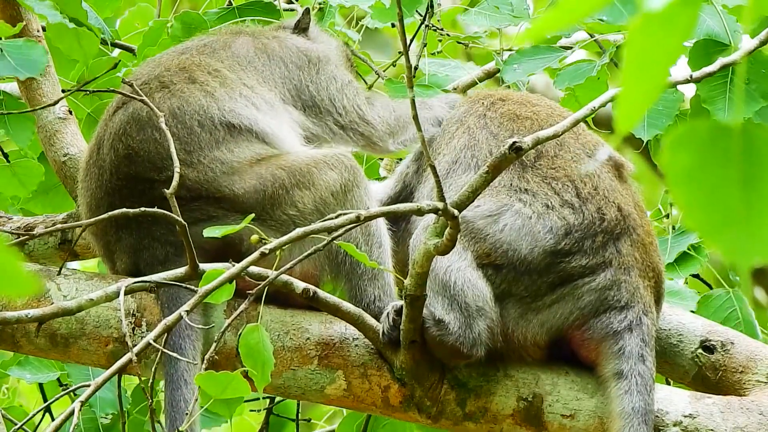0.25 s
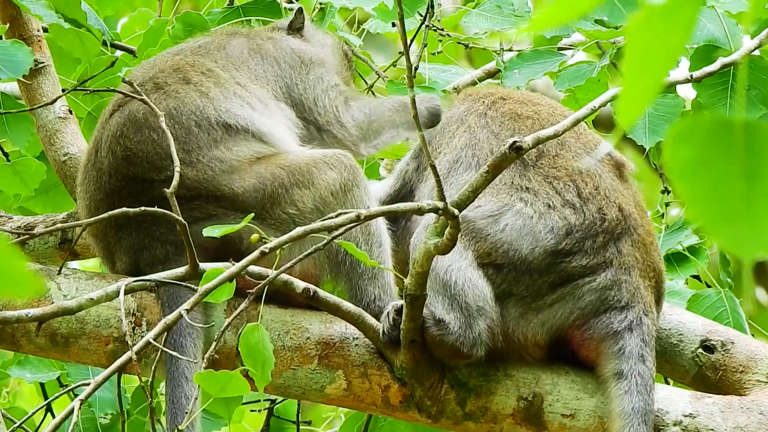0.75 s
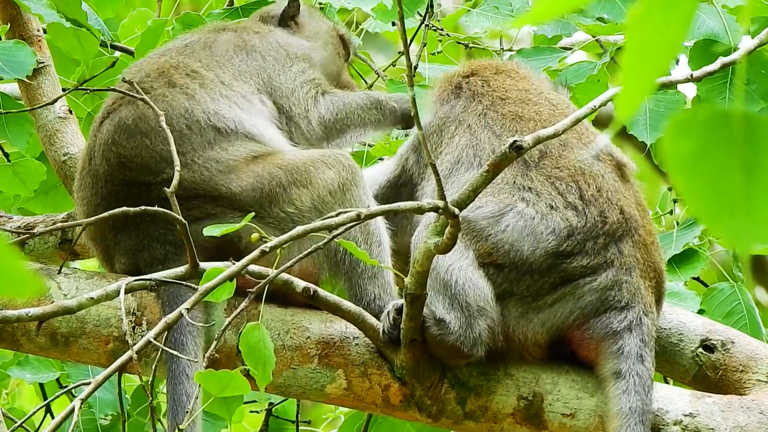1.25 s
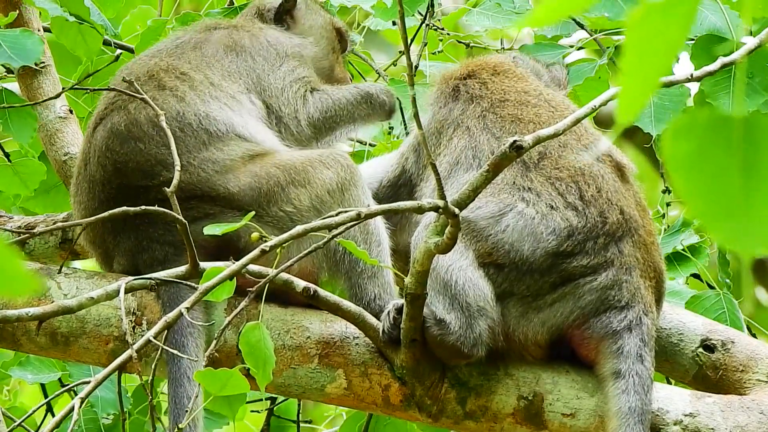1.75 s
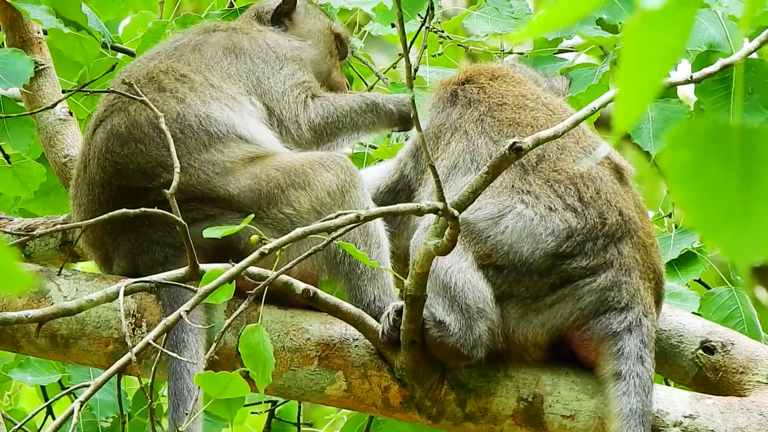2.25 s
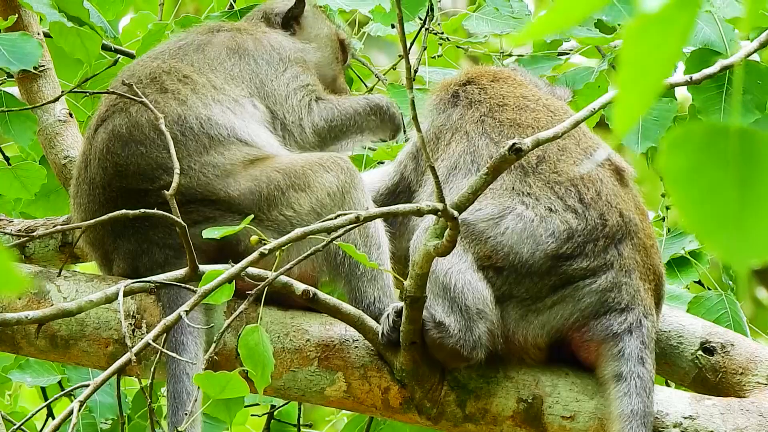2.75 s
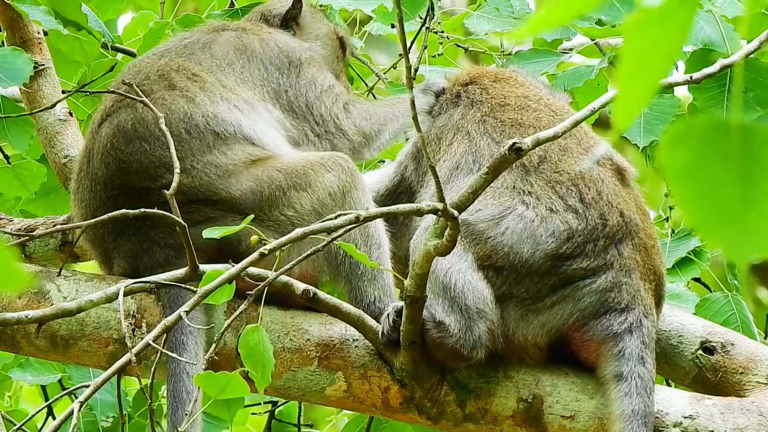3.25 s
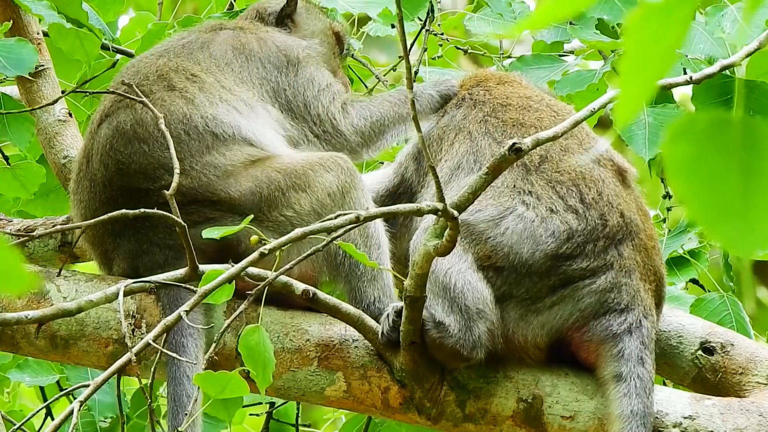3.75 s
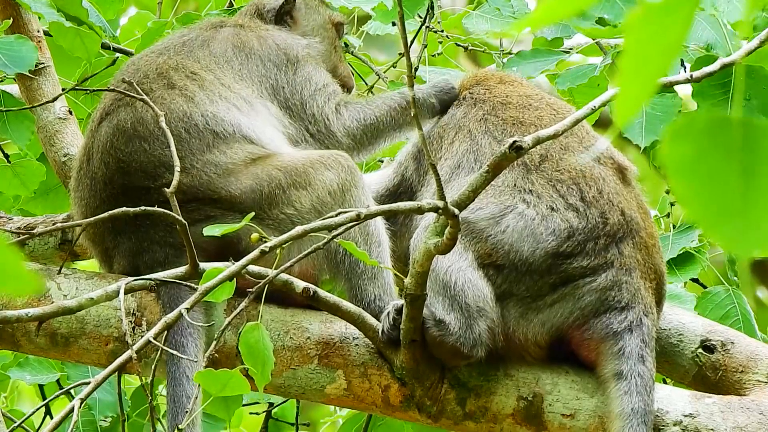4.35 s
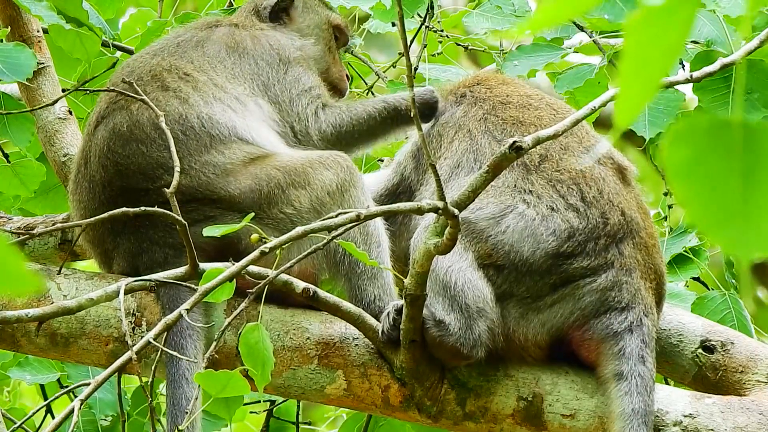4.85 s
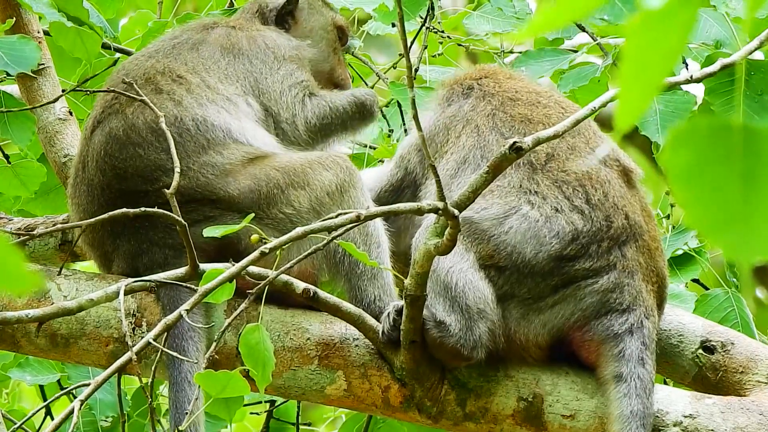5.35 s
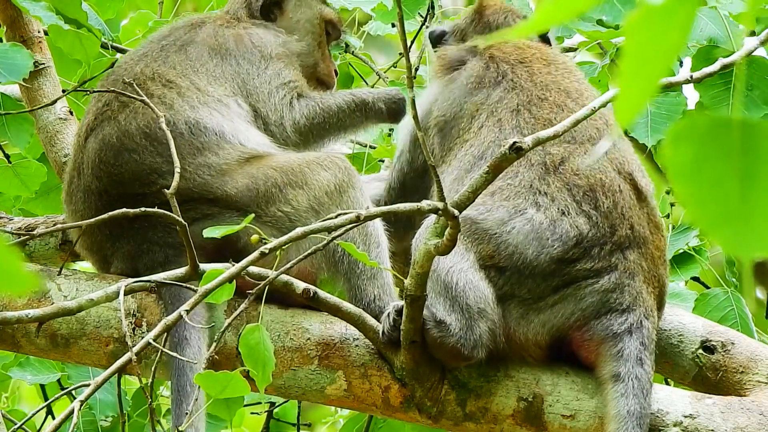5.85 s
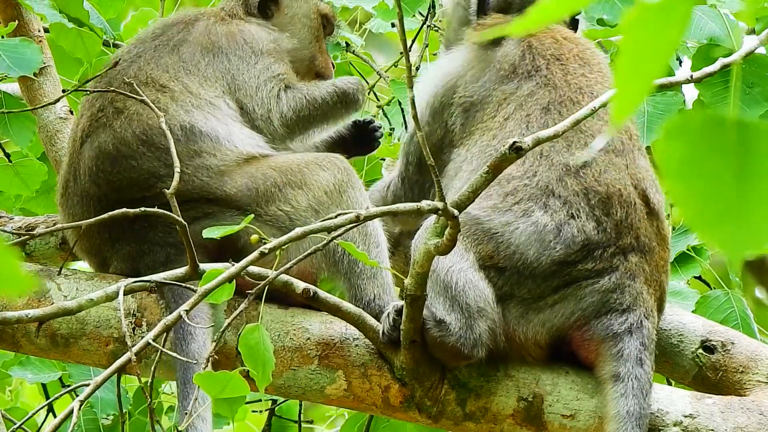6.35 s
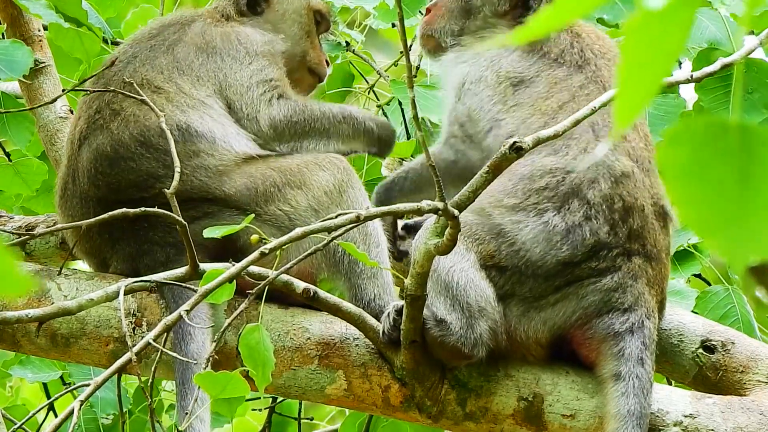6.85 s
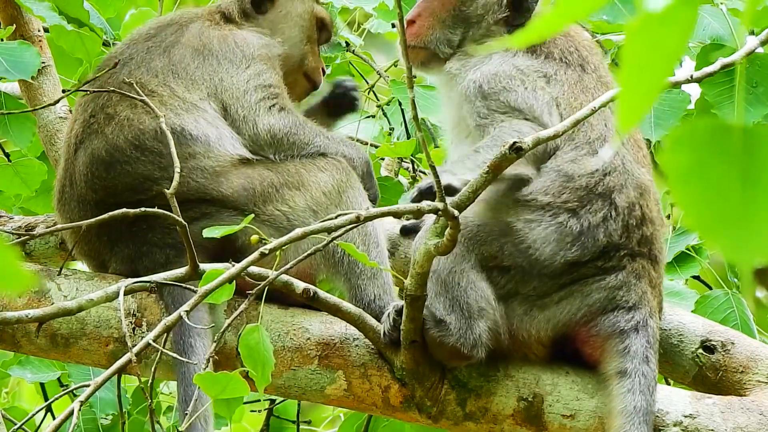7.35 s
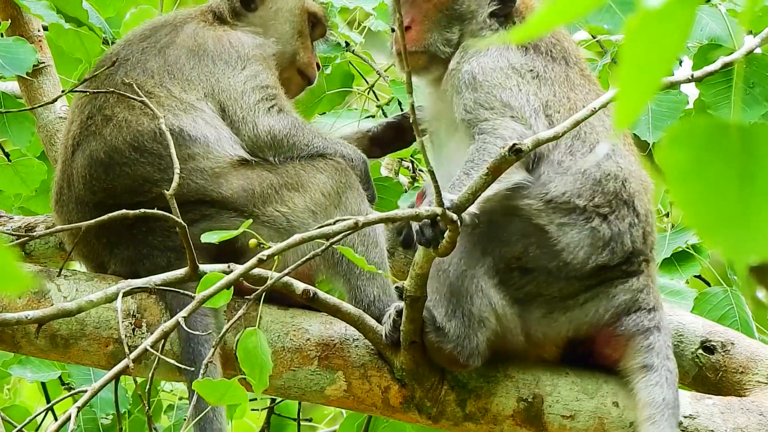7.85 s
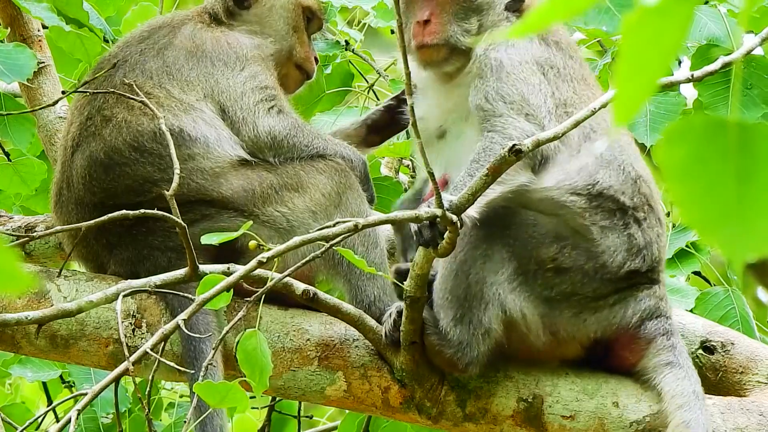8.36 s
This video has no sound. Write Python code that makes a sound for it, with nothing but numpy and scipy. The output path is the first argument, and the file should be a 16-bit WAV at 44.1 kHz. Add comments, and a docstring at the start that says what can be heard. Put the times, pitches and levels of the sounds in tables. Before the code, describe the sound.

Five piercing bird chirps, spaced irregularly, ring through leaves above steady insect buzzing, soft forest hiss and faint distant bird calls.

```python
"""A bird gives five sharp, arching chirps in a tropical forest by day; each is a gliding whistle scattered by leaves.
Three bush crickets buzz in rapid bursts of tone, over the hiss of a far insect chorus and a hush, both coloured noise.
From deeper in the trees come an uneven band of noise for blurred distant calls, faint falling chips, two thin
whistles and some hoarse calls (echoing tones). Once, something bumps softly: a few low tones that die away fast."""
import sys
import numpy as np
from scipy import signal
from scipy.fft import rfft, irfft
from scipy.io import wavfile

SR = 44100
rng = np.random.default_rng(int(sys.argv[2]) if len(sys.argv) > 2 else 0)


def unload_wav(signal):
    """Save mono or channel-first audio to the path in sys.argv[1] as 16-bit WAV at rate SR, clipped to [-1, 1]."""
    wavfile.write(
        sys.argv[1],
        SR,
        np.round(np.clip(np.atleast_2d(signal).T, -1, 1) * 32767).astype(np.int16),
    )


N = 379260
TIME = np.arange(N) / SR


def from_db(db):
    """Turn decibels into a gain."""
    return 10 ** (np.asarray(db) / 20)


def rms_one(x):
    """Scale a sound to an average strength (rms) of 1."""
    return x / np.sqrt(np.mean(x ** 2) + 1e-20)


def in_time(rows):
    """Join the points of a curve in time by straight lines."""
    times, values = np.reshape(rows, (-1, 2)).T
    return np.interp(TIME, times, values)


def at_hz(points, hz):
    """Read a curve over pitch, spaced by ratio as the ear hears it."""
    point_hz, values = np.array(points).T
    return np.interp(np.log(hz + 1e-9), np.log(point_hz), values)


def panned(side_db):
    """Left and right gains; positive means louder on the left."""
    return from_db(np.array([[.5], [-.5]]) * side_db)


def drift(rate_hz):
    """Random wandering with spread 1; wobbles faster than the rate are weakened."""
    hz = np.fft.rfftfreq(N, 1 / SR)
    spectrum = rfft(rng.standard_normal(N))
    return rms_one(irfft(spectrum / (1 + (hz / rate_hz) ** 2), N))


def swell(middle_s, length_s):
    """A smooth rise and fall."""
    return np.cos(np.pi * np.clip((TIME - middle_s) / length_s, -.5, .5))


# How alike the two ears hear the surrounding noise: pitch_hz, correlation (1 is identical)
EAR_LIKENESS = [(30, 0.46), (300, 0.54), (3000, 0.59), (7000, 0.12), (15000, 0.018)]
# How far the surrounding noise leans to the left: pitch_hz, left_over_right_db
EAR_BALANCE = [(30, 2), (1300, -.5), (2400, -3), (8000, -3.5), (15000, 1)]


def diffuse(colour, patchy_db, flicker_hz):
    """Stereo noise from all around, rms 1; each band below 7000 Hz wavers on its own."""
    hz = np.fft.rfftfreq(N, 1 / SR)
    mid, side = rfft(rng.standard_normal((2, N)))
    alike = np.clip(at_hz(EAR_LIKENESS, hz), -1, 1)
    # the middle part is the same in both ears, the side part is opposite
    both = np.sqrt(1 + alike) * mid + np.sqrt(1 - alike) * side * [[1], [-1]]
    both = both * from_db(at_hz(colour, hz)) * panned(at_hz(EAR_BALANCE, hz))
    edges_hz = np.append(0, np.geomspace(500, 7000, 10))
    out = irfft(both * (hz >= edges_hz[-1]), N)
    for low, high in zip(edges_hz, edges_hz[1:]):
        band = irfft(both * ((hz >= low) & (hz < high)), N)
        out += band * from_db(patchy_db * drift(flicker_hz))
    return rms_one(out)


def foliage(x, wet_db, t60, early_db, early_t60):
    """Direct sound, quick reflections off near leaves and a long, clumpy scatter from trunks; power is kept.

    wet_db and early_db set the long and quick echoes; each t60 is the time in s to fade by 60 dB.
    """
    t = TIME[:SR]
    # sparse random reflections; the shared part reaches both ears
    leaves, trunks, shared = rng.standard_normal((3, 2, SR)) * (rng.random((3, 2, SR)) < .04)
    clump_s, clump_db = .005, 2
    knots = np.arange(0, 1, clump_s)
    clumps = from_db(clump_db * np.interp(t, knots, rng.standard_normal(len(knots))))
    near = (leaves + 0.96 * shared[0]) * from_db(-60 * t / early_t60)
    far = (trunks + 0.66 * shared[1]) * clumps * from_db(-60 * t / t60)
    far = far * (1 - np.exp(-t / 0.0089))  # the long scatter takes a moment to build up
    echoes = (from_db(early_db) * rms_one(near) + from_db(wet_db) * rms_one(far)) / np.sqrt(SR)
    echoes[:, 0] += 1  # the direct sound
    echoes = echoes / np.sqrt(np.sum(echoes ** 2) / 2)
    return signal.fftconvolve(x * np.ones((2, 1)), echoes, axes=1)[:, :N]


def note(form, start_s, stretch, overtone_db, rough):
    """One gliding whistle with a weak octave; a rapid random quaver in pitch makes it harsh."""
    s, hz, db = np.transpose(form)
    out = np.zeros(N)
    on = (TIME >= start_s) & (TIME < start_s + s[-1] * stretch)
    age = (TIME[on] - start_s) / stretch
    quaver = np.interp(age, np.arange(200) / 1400, rng.standard_normal(200))
    phase = 2 * np.pi * np.cumsum(np.interp(age, s, hz) * (1 + rough * quaver)) / SR
    edges = np.clip(np.minimum(age, s[-1] - age) / 0.002, 0, 1)  # soft start and end
    tone = np.sin(phase) + from_db(overtone_db) * np.sin(2 * phase)
    out[on] = np.sqrt(2) * edges * from_db(np.interp(age, s, db)) * tone
    return out


# Tone colour of the forest's own hush, only the shape counts: pitch_hz, level_db (per Hz)
HUSH_COLOUR = [(20, 2.5), (50, -13.5), (130, -11.5), (300, -13.5), (400, -8.5), (520, -13), (1100, -2),
               (2300, -5), (5700, -1), (6300, -14), (8400, -3.5), (9100, -3), (11000, -12.5),
               (15500, -31.5)]


def forest_hush():
    """The forest's own hush: steady coloured noise with a very slight flicker."""
    return from_db(-64.5) * diffuse(HUSH_COLOUR, patchy_db=0.25, flicker_hz=18)


# Level of the noise band from about 1200 to 2600 Hz, distant calls included, before a small lift:
# time_s, level_db
CALL_BAND_LEVEL = [(0.0, -70), (1.03, -67), (1.53, -70.5), (1.87, -62), (2.11, -75), (3.21, -75),
                   (3.97, -70), (4.21, -71.5), (4.76, -66), (4.98, -72), (6.03, -65.5), (7.11, -75),
                   (7.5, -66), (8.6, -73.5)]
# Tone colour of that band, only the shape counts: pitch_hz, level_db (per Hz)
CALL_BAND_TONE = [(800, -19), (1200, -3), (1700, -3), (2200, 0.5), (2600, 0.5), (3100, -25)]


def far_call_band():
    """Blurred distant calls as a band of noise: its level is uneven and its parts flicker."""
    lift_db = 0.5
    return from_db(lift_db + in_time(CALL_BAND_LEVEL)) * diffuse(CALL_BAND_TONE, patchy_db=3.0, flicker_hz=19)


# Uneven level of the hiss from about 2850 to 4700 Hz, before a lift: time_s, level_db
HISS_LEVEL = [(0.0, -63), (.6, -62), (1.12, -63.5), (1.39, -66), (1.62, -64), (2.0, -64.5), (2.44, -65.5),
              (2.99, -69), (3.88, -61), (4.21, -63.5), (6.78, -65), (8.14, -65), (8.6, -70.5)]
# Tone colour of the hiss, only the shape counts: pitch_hz, level_db (per Hz)
HISS_TONE = [(2500, -38), (2850, 0), (3100, 4.5), (3600, 3), (4200, 3.5), (4700, -1), (5300, -46),
             (6200, -23.5)]


def insect_chorus():
    """The hiss of far insects: coloured noise with an uneven level and flickering bands."""
    lift_db = 2.5
    return from_db(lift_db + in_time(HISS_LEVEL)) * diffuse(HISS_TONE, patchy_db=2.0, flicker_hz=11.0)


def cricket(tone_hz, strokes_per_s, sharpness, tone_spread):
    """Every wing stroke gives a short burst of a slightly unsteady tone."""
    stroke = np.cumsum(strokes_per_s * (1 + 0.0099 * drift(6.1))) / SR
    burst = np.abs(np.sin(np.pi * stroke)) ** sharpness
    phase = 2 * np.pi * np.cumsum(tone_hz * (1 + tone_spread * drift(119.8))) / SR
    return rms_one(burst * np.sin(phase))


# Phrases of the nearest cricket, several short and then one long: start_s, length_s, level_db (at the start)
CRICKET_PHRASES = [(0.02, 0.17, -59), (0.62, 0.42, -61.5), (1.344, 0.34, -60.5), (1.967, 0.38, -61),
                   (2.547, 0.75, -63), (3.524, 5.3, -63.5)]


def phrased_song():
    """Level in dB: each phrase rises quickly, sags while it is held and falls away."""
    rise_db_per_s, fall_db_per_s, sag_db_per_s = 175, 118, 0.6
    level = np.full(N, -74.0)  # the faint buzz between phrases
    for start_s, length_s, db in CRICKET_PHRASES:
        age = TIME - start_s
        outside = np.maximum(-age * rise_db_per_s, (age - length_s) * fall_db_per_s)
        held = db - sag_db_per_s * np.maximum(age, 0)
        level = np.maximum(level, held - np.maximum(outside, 0))
    return level


# The three singers, nearest last: tone_hz, strokes_per_s, left_over_right_db,
# tone_unsteadiness (share of the tone), echo_db (middle of the two echo levels)
CRICKET_SINGERS = [(6800, 63, -3, .019, 9), (7230, 70, -3, .025, 9), (7810, 70.3, -2, .008, 4.5)]
# The two farther crickets, which sing without a break: start_level_db, growth_db_per_s
UNBROKEN_SONGS = [(-68, 0.41), (-64, 0.05)]


def crickets():
    """Three singers, the highest the nearest and purest; leaves blur the strokes of the farther ones."""
    out = 0
    waver_db, waver_hz = 1.52, 9
    songs = [db + growth * TIME for db, growth in UNBROKEN_SONGS] + [phrased_song()]
    for (hz, rate, side_db, spread, echo_db), song_db in zip(CRICKET_SINGERS, songs):
        voice = cricket(hz, rate, sharpness=2.5, tone_spread=spread)
        left, right = foliage(voice, wet_db=echo_db - 1, t60=.35, early_db=echo_db + 1, early_t60=.02)
        blurred = np.array([rms_one(left), rms_one(right)])
        loudness = from_db(song_db + waver_db * drift(waver_hz))
        out = out + panned(side_db) * loudness * blurred
    return out


# Faint held whistles: middle_s, length_s, pitch_hz, level_db (before the bloom)
FAR_WHISTLES = [(0.842, 0.88, 1785, -69.5), (6.178, 0.46, 1785, -67.5)]


def far_whistles():
    """Thin, slightly unsteady tones that bloom in their middle."""
    whistles = 0
    for middle_s, length_s, hz, db in FAR_WHISTLES:
        tone = np.sin(2 * np.pi * np.cumsum(hz * (1 + 0.0072 * drift(46))) / SR)
        bloom = swell(middle_s, length_s) + 2 * swell(middle_s, length_s / 5)
        whistles = whistles + from_db(db) * bloom * tone
    return panned(-1.6) * foliage(whistles, wet_db=0.0, t60=0.28, early_db=-20, early_t60=0.064)


# The near bird's long chirp, before stretching: time_s, pitch_hz, level_db (added to each chirp's own)
LONG_FORM = [(0, 3500, -33), (.008, 3980, -19), (.018, 4630, -8), (.03, 5400, -7.5), (.042, 5860, -3.5),
             (.054, 6080, -10), (.069, 6270, -13.5), (.081, 6045, -3.5), (.089, 4786, -9),
             (.097, 3210, -23.5)]
# Its short chirp, same columns: time_s, pitch_hz, level_db
SHORT_FORM = [(0, 3860, -39), (.011, 4420, -19.5), (.02, 4900, -15.5), (.033, 5650, -9), (.04, 5770, -6),
              (.045, 6050, -4), (.05, 6525, -9.5), (.062, 6350, -12.5), (.07, 5670, -12.5),
              (.076, 4760, -25.5), (.082, 3340, -24)]
# When it chirps: start_s, level_db, stretch (times as long), left_over_right_db, form (0 long, 1 short)
BIRD_CHIRPS = [(0.886, -19.5, 0.98, -1.5, 0), (2.476, -20.5, 0.95, -2.5, 1), (3.655, -20, 0.97, -1.5, 0),
               (6.043, -21, 0.98, -3, 1), (8.064, -21.5, 1, -1, 0)]


def near_bird():
    """Each chirp climbs, holds and drops; the short form is harsher and comes through more leaves."""
    long_calls, short_calls = np.zeros((2, 2, N))
    for start_s, db, stretch, side_db, form in BIRD_CHIRPS:
        gains = from_db(db) * panned(side_db)
        if form < .5:
            long_calls += gains * note(LONG_FORM, start_s, stretch, overtone_db=-25, rough=0.005)
        else:
            short_calls += gains * note(SHORT_FORM, start_s, stretch, overtone_db=-33.5, rough=0.0087)
    return (foliage(long_calls, wet_db=8.5, t60=0.4, early_db=8.5, early_t60=0.14)
            + foliage(short_calls, wet_db=19, t60=0.45, early_db=15.0, early_t60=0.15))


# Far hoarse calls: middle_s, length_s, pitch_hz, level_db
HOARSE_CALLS = [(1.633, 0.06, 2114, -58), (1.702, 0.064, 2380, -55), (1.769, 0.078, 2223, -51.5),
                (1.86, 0.037, 2220, -58), (2.536, 0.26, 2034, -60), (3.715, 0.11, 2055, -57),
                (4.015, 0.099, 1755, -61), (5.334, 0.093, 2212, -59), (6.644, 0.086, 2250, -56.5),
                (6.724, 0.14, 2238, -54.5), (7.503, 0.066, 2086, -58)]


def hoarse_calls():
    """Far calls in an unsteady voice, which smears its pitch and rattles in loudness."""
    rasp = np.cumsum(1 + .1 * drift(202.1)) / SR
    rattle = rms_one(from_db(2.7 * drift(38)))
    calls = 0
    for middle_s, length_s, hz, db in HOARSE_CALLS:
        calls = calls + from_db(db) * swell(middle_s, length_s) * np.sin(2 * np.pi * hz * rasp)
    return panned(-1.6) * foliage(rattle * calls, wet_db=8, t60=0.44, early_db=8, early_t60=0.038)


# One soft falling chip, before stretching: time_s, pitch_hz, level_db (added to each chip's own)
CHIP_FORM = [(0, 7270, -4), (.01, 6320, 6.5), (.024, 5370, -2.5), (.05, 4960, 4.5), (.06, 4360, -5)]
# When the chips come: start_s, level_db, stretch (times as long)
FAR_CHIPS = [(2.063, -54, 0.93), (2.839, -62, 0.77), (3.975, -59.5, 1), (4.966, -57, 0.61),
             (5.949, -53, 0.94), (7.855, -55, 0.96)]


def far_chips():
    """Short falling whistles, rough in pitch, that arrive mostly as echo."""
    chips = 0
    for start_s, db, stretch in FAR_CHIPS:
        chips = chips + from_db(db) * note(CHIP_FORM, start_s, stretch, overtone_db=-22, rough=0.078)
    return panned(-1.6) * foliage(chips, wet_db=19, t60=0.61, early_db=16, early_t60=0.3)


# The soft bump and the much fainter knock just after it: start_s, level_db
BUMP_KNOCKS = [(4.56, -54), (4.675, -70)]
# The tones the bump rings with: pitch_hz, level_db (added to the knock's own), t60_s (time to fade by 60 dB)
BUMP_TONES = [(126, -2, 0.092), (164, -6, 0.055), (230, -4.5, 0.066), (333, -21, 0.045), (615, -20, .06)]


def bump():
    """A soft, low knock on wood: a few tones start together and die away."""
    out = np.zeros(N)
    for start_s, db in BUMP_KNOCKS:
        age = np.maximum(TIME - start_s, 0)
        for hz, tone_db, t60_s in BUMP_TONES:
            fading = from_db(db + tone_db - 60 * np.minimum(age / t60_s, 2))
            out -= fading * np.sin(2 * np.pi * hz * age)
    # the branch radiates little below 100 Hz
    out = signal.sosfilt(signal.butter(2, 100, "high", fs=SR, output="sos"), out)
    return panned(-12) * foliage(out, wet_db=-5.5, t60=0.43, early_db=-6, early_t60=0.088)


def scene():
    """The near bird over the crickets and the far sounds of the forest."""
    background = forest_hush() + far_call_band() + insect_chorus()
    far_birds = far_whistles() + hoarse_calls() + far_chips()
    return background + crickets() + far_birds + near_bird() + bump()


def record(dry):
    """The top is cut steeply above 15700 Hz."""
    return signal.sosfilt(signal.ellip(10, .1, 80, 15700, fs=SR, output="sos"), dry)


dry = scene()
out = record(dry)
unload_wav(out)
```